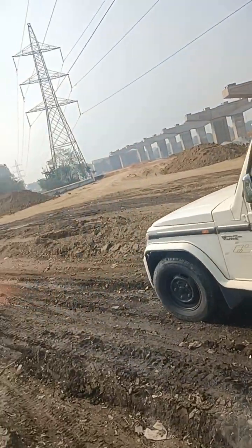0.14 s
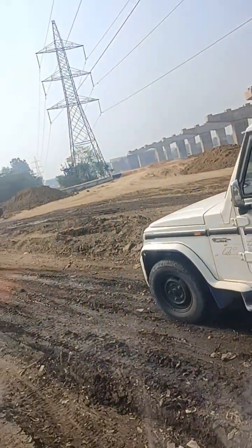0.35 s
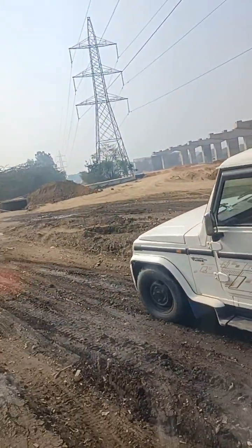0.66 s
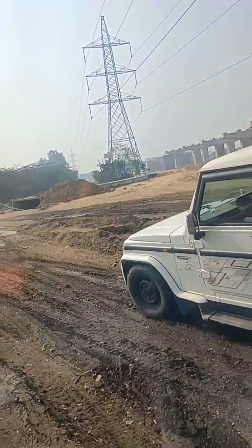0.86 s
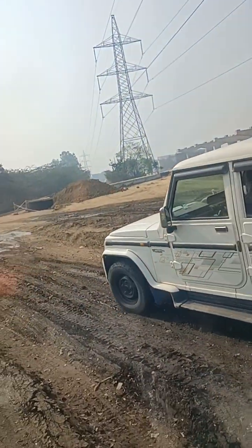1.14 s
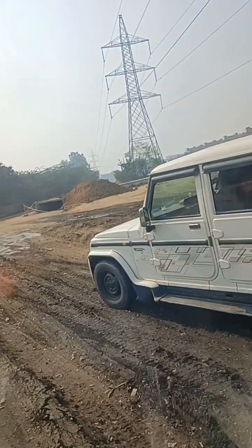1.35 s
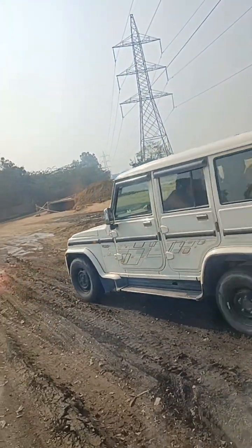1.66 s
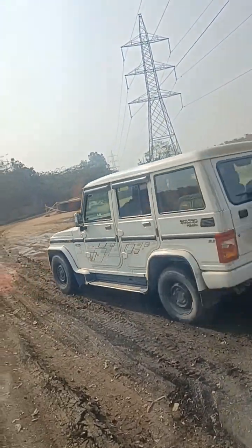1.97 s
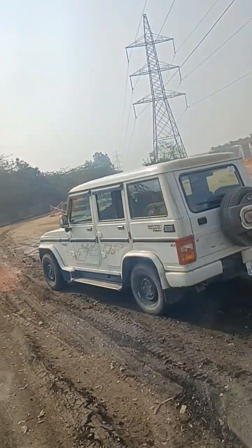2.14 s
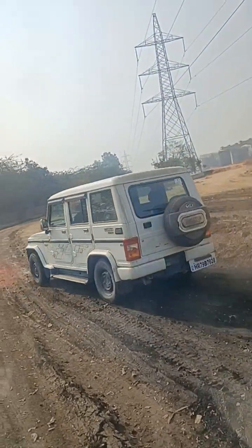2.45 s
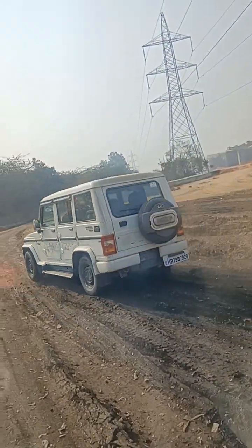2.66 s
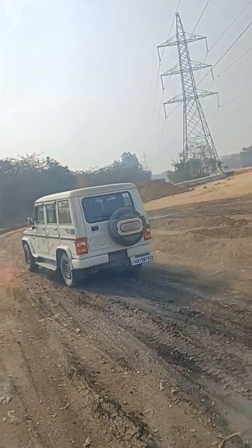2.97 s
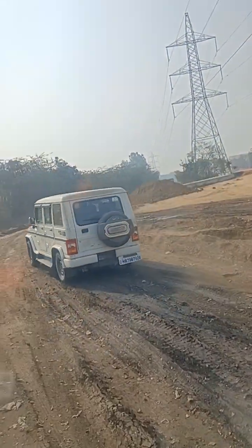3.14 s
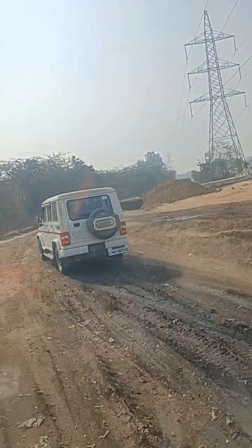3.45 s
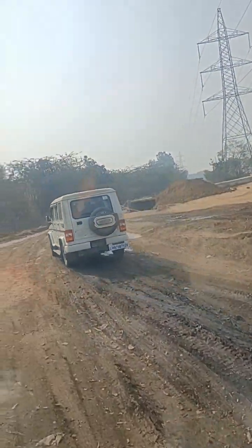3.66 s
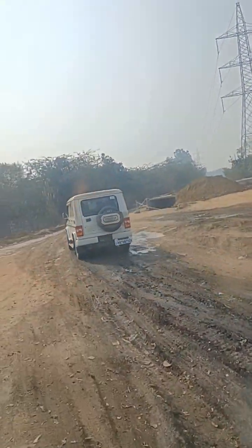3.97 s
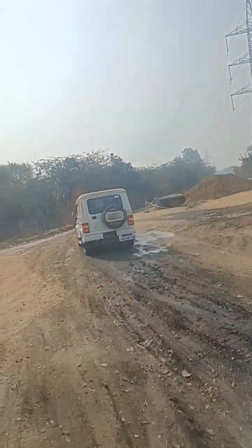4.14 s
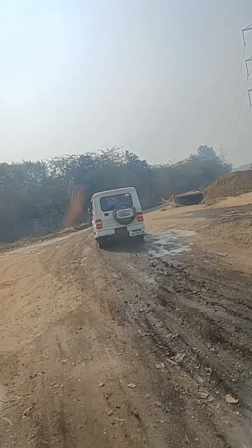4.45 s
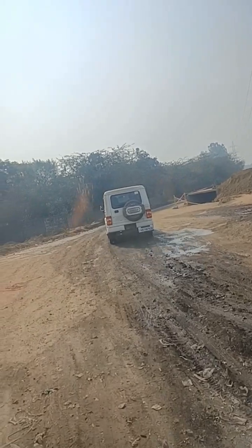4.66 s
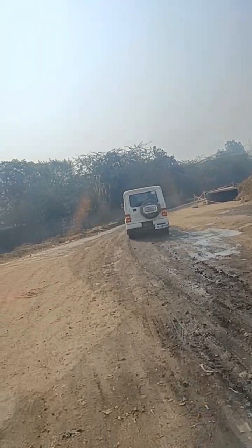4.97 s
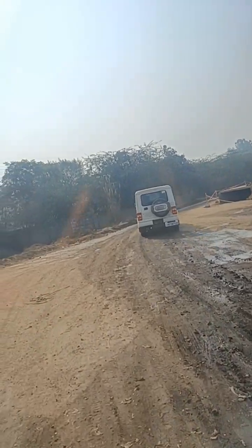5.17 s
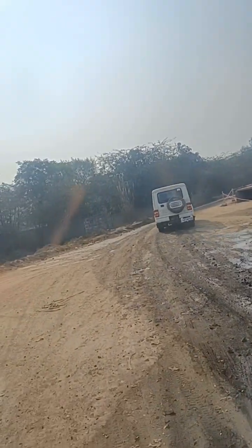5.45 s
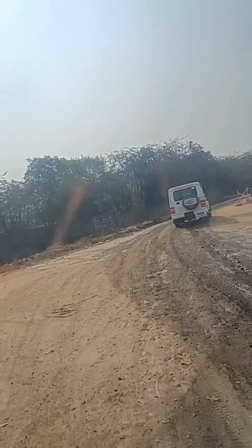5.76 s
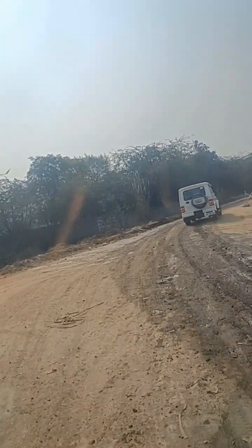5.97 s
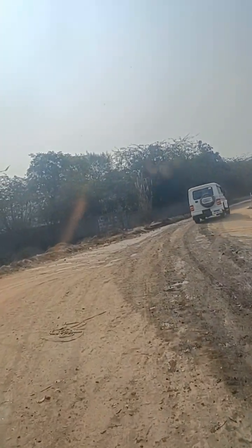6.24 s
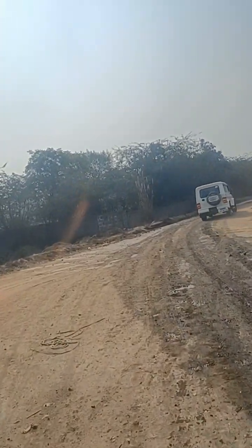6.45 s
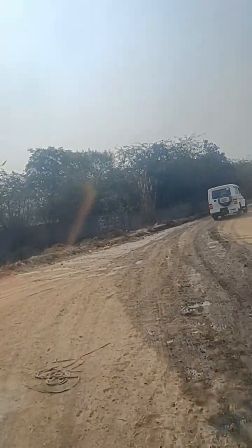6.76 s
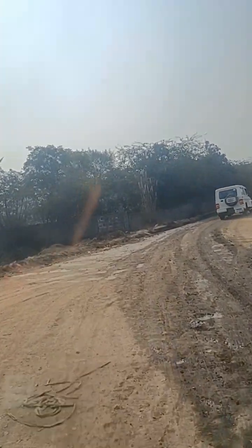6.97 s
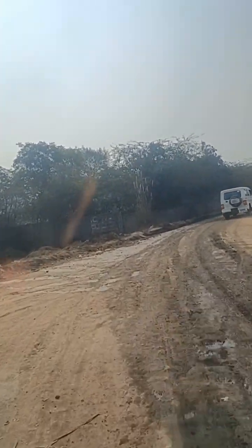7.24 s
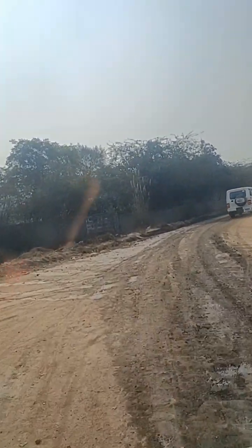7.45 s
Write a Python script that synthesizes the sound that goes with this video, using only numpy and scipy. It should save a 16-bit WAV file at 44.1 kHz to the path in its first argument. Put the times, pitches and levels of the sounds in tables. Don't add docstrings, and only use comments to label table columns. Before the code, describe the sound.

Heard from a phone inside a car on a rutted dirt track: a low, near-idling engine throb over wheel thud and tyre roar. A first second of knocks and plastic clatter gives way to a smoother stretch as the engine surges around two seconds, then eases. Sharp rattles hit at three and a half seconds, and bumps, rattles and squeaks crowd the last second as the engine climbs again.

```python
import sys
import numpy as np
from scipy import signal
from scipy.fft import rfft, irfft, next_fast_len
from scipy.io import wavfile
from scipy.ndimage import uniform_filter1d

SR = 44100
rng = np.random.default_rng(int(sys.argv[2]) if len(sys.argv) > 2 else 0)


def log_audio(samples):
    frames = np.atleast_2d(samples).T
    limited = np.clip(frames, -1, 1)
    pcm = np.round(limited * 32767).astype(np.int16)
    wavfile.write(sys.argv[1], SR, pcm)


def voltage_ratio(level):
    return 10 ** (np.asarray(level, float) / 20)


N = 335601

# (time [s], speed [engine cycles per s])
ENGINE_SPEED = [(0.0, 11.5), (.85, 11.6), (1.25, 12.9), (1.877, 13.9), (2.042, 18.21), (2.254, 21.85),
                (2.658, 18.92), (2.957, 18.95), (4.125, 13.25), (4.735, 14.38), (5.526, 17.14),
                (5.906, 16.37), (6.162, 17.77), (6.44, 17.66), (6.679, 21.24), (6.933, 19.61),
                (7.155, 22.76), (7.61, 22.82)]
# (time [s], level [dB])
ENGINE_LOAD = [(0.0, -17), (0.56, -25.5), (1.5, -23), (1.85, -14.5), (2.1, -10), (2.28, -8), (2.62, -12.5),
               (3.15, -13.5), (3.55, -17), (4.2, -11), (4.9, -18.5), (5.55, -15), (5.95, -17),
               (6.48, -15.5), (6.7, -13), (6.9, -15), (7.18, -9.5), (7.61, -10.5)]
SIDE_ORDERS = [-30, -29, -43, -35.5, -42, -41, -45, -48, -47]
# (frequency [Hz], gain [dB])
CABIN_BOOM = [(28, 0), (34, -4), (42, -4), (56, 0), (68, -11), (92, -16.5), (150, -21.5), (210, -34)]
# (frequency [Hz], width [Hz], level over the firing [dB])
DASH_PANELS = [(340, 35, -25), (507, 30, -28), (611, 26, -40)]
SECOND_ORDER_DB = -23
IDLE_PER_S, SHIFT_S = 12.8, .03
SHAKE_SHARE = .3
MOUNT_PER_S, MOUNT_WIDTH_PER_S, MOUNT_DB = 14.2, 2.0, 7

# (time [s], peak level [dB], ring [Hz], clank over the peak [dB])
LATCH_RATTLES = [(0.925, -32.5, 5370, -12), (1.002, -27, 5660, -27), (1.181, -32, 6300, 5),
                 (1.36, -34, 6070, -23), (1.3915, -28, 5930, -34), (2.8994, -34, 5680, 2),
                 (3.5442, -16, 5640, -19), (3.922, -27.5, 5300, -7), (4.4703, -37, 4070, 12),
                 (5.664, -22.5, 5100, -5.5), (5.9732, -23, 4500, -8), (6.508, -32, 3544, 3),
                 (6.622, -27.5, 5450, 7), (6.647, -9, 5460, -32), (6.764, -24, 4060, -13),
                 (7.033, -19.5, 5800, -39), (7.0746, -24, 5430, -16), (7.1178, -21, 5400, -26),
                 (7.261, -24, 4380, 2.5)]
# (time [s], peak level [dB], low ring [Hz], high ring [Hz], low ring over the peak [dB])
TRIM_TAPS = [(0.1954, -46, 3020, 6160, 9), (0.7067, -33.5, 2750, 4030, 5), (0.7236, -28, 2800, 5600, 4),
             (0.7444, -31.5, 2180, 5360, 7.5), (0.76, -32, 2170, 4080, -6), (0.8065, -33.5, 3520, 3860, 7),
             (0.8335, -40, 2550, 5630, 15), (0.8486, -28, 2720, 3900, 11.5), (1.53, -37, 2030, 5100, 3),
             (7.288, -35.5, 3550, 5400, 10), (0.8612, -29.5, 2510, 3300, 13), (0.8844, -57, 3100, 3600, 30),
             (1.0382, -21.5, 2300, 3950, -6), (1.1326, -19, 3260, 3630, -15), (1.1994, -40, 2380, 3700, 19),
             (1.6496, -31.5, 3500, 3827, 1), (3.494, -11, 3350, 5790, -24), (3.717, -26, 3310, 5220, -5),
             (4.0658, -34, 2618, 5230, 0), (6.4612, -29, 2640, 5770, -5), (6.5635, -33.5, 3500, 5770, 6),
             (6.7004, -29.5, 3040, 5253, 9), (6.825, -18, 2830, 3780, -38), (6.8585, -31.5, 1800, 3430, 5),
             (7.1741, -36, 2340, 5660, 11), (7.554, -22, 2600, 5800, -7)]
# (time [s], peak level [dB], low ring [Hz], high ring [Hz], low ring over the peak [dB])
CLOSE_SNAPS = [
    (0.0399, -33.5, 1430, 5470, 12.5),
    (0.17, -32, 3060, 6000, 15),
    (1.0531, -26.5, 1000, 3820, 0),
    (1.095, -23, 1660, 4850, -14.5),
    (3.5077, -39, 1400, 5810, -6.5),
]
# (frequency [Hz], level [dB])
TRIM_MODES = [(1427, 3), (1814, -19), (2300, -17), (2907, 21.5), (3348, 23), (3865, 19.5), (4673, 16),
              (5464, -14), (5846, -24), (6207, -14), (6589, -4)]
LATCH_CLANK_HZ = 1146
LATCH_FIZZ_DB, TAP_FIZZ_DB, SNAP_FIZZ_DB = -31, -36, -13.5
FIZZ_SQUEEZE = 0.033

# (time [s], peak level [dB], ring [Hz], brightness [dB], length [s])
SUSPENSION_KNOCKS = [(0.044, -25, 362, -10.5, 0.067), (0.099, -22.5, 325, -5, 0.026),
                     (0.11, -19.5, 225, -27, 0.011), (0.128, -17, 159, -41, 0.03),
                     (0.165, -24.5, 148, -7, 0.068), (0.441, -25.5, 318, -19, 0.043),
                     (0.731, -26, 238, -14, 0.068), (0.848, -27.5, 433, -8, 0.04),
                     (0.922, -27.5, 161, -20, 0.022), (1.049, -39, 151, -2, 0.052),
                     (1.178, -24.5, 205, -11, 0.02), (1.188, -23, 253, -18, 0.03),
                     (1.207, -25, 201, -23, 0.015), (1.669, -33.5, 151, -2, 0.025),
                     (2.891, -28, 167.2, -5.5, 0.043), (3.493, -21.5, 151, -15, 0.04),
                     (3.544, -34, 152, 2, 0.031), (3.913, -27.5, 152, -4, 0.039),
                     (4.458, -30, 150.6, -11, 0.033), (5.627, -23.5, 275.7, -21, 0.07),
                     (6.604, -25.5, 191, -14, 0.027), (6.836, -27, 274, -21, 0.024),
                     (7.024, -34, 157, -3, 0.042), (7.241, -36, 161, -1, 0.033),
                     (6.722, -30.5, 210, -28, 0.03), (7.1, -31.5, 205, -25, 0.03),
                     (7.344, -32, 198, -25, 0.04), (6.529, -28.5, 477, -24, 0.03),
                     (7.555, -23, 223, -32, 0.022)]
# (start time [s], length [s], first pitch [Hz], last pitch
# [Hz], level [dB])
RUBBER_SQUEAKS = [(7.362, .027, 5430, 5370, -33), (7.396, .056, 5580, 5270, -29),
                  (7.434, .056, 5210, 4890, -31), (2.22, .034, 1150, 1160, -41),
                  (2.256, .036, 1160, 1185, -36), (7.07, .04, 5400, 5750, -36),
                  (7.25, .24, 1235, 1215, -45), (6.63, .08, 1432, 1432, -43),
                  (1.085, .047, 4500, 4800, -37), (7.05, .08, 1440, 1425, -42),
                  (7.255, .05, 1430, 1415, -40), (7.17, .33, 159, 162, -36), (7.08, .45, 595, 615, -45),
                  (6.05, .3, 960, 975, -48), (6.78, .12, 310, 265, -35)]
GRIP_S, GRIP_DB, SLIP_DB = .015, -10, -7

# (time [s], level [dB])
TRACK_SHAKE = [(0.0, 1.5), (0.25, -1), (1.4, -0.5), (2.3, 2), (2.7, 0), (4.0, 1), (5.0, 0), (6.3, 3),
               (7.3, 4.5), (7.61, 5)]
# (frequency [Hz], density [dB per Hz])
THUD_COLOUR = [(8, -44), (18, -41), (27, 6), (38, -35), (55, 12.5), (80, -1), (120, -42), (160, -36)]
# (frequency [Hz], density [dB per Hz])
ROAR_COLOUR = [(53, -45), (90, -7.5), (103, -8), (172, -13.5), (287, -16), (385, -22.5), (600, -24),
               (956, -29), (1200, -31.5), (1560, -86), (2640, -120)]
# (frequency [Hz], density [dB per Hz])
HUM_COLOUR = [(410, -23), (700, -29), (791, 0.5), (960, -5), (1920, -4), (2080, -3.5), (3470, -8.5),
              (4040, -8), (4760, -11.5), (5830, -10.5), (7010, -15), (8000, -13), (10400, -26),
              (17600, -120)]
# (frequency [Hz], density [dB per Hz])
HISS_COLOUR = [(4880, -56), (8300, -26), (9290, -18), (10300, -6.5), (12300, -10), (13400, -7),
               (14100, -4.5), (14900, -10), (15500, -12)]
# (frequency [Hz], width [Hz], level over the hum [dB])
BODY_PANELS = [(23.5, 4.1, 1), (35.65, 5.8, 15.5), (205.1, 11.4, -1), (290.5, 77, -5), (430, 29, -10),
               (605.5, 39, -11), (1202, 11, -21.5), (2490, 560, -13), (1415, 3.4, -23)]
# (frequency [Hz], width [Hz], level [dB], place in the cycle [0-1])
VALVE_TICKS = [(5660, 400, -41, 0.6), (10470, 400, -47, 0.45), (6770, 520, -43, 0.63),
               (14300, 2500, -60, 0.46), (14000, 2500, -56, 0.23)]
CRUISE_PER_S = 17
THUD_DB, THUD_LOAD, THUD_LUMP_DB = -27.5, 0.14, 1.5
ROAR_DB, ROAR_SHAKE = -34, 0.33
HUM_DB, HUM_DB_PER_CYCLE = -42.5, 0.3064
HISS_DB, HISS_DB_PER_CYCLE, HISS_LOAD = -50.5, 0.2, 0.57

# (frequency [Hz], likeness [0-1])
PORT_LIKENESS = [(60, 0.98), (130, 0.93), (290, 0.94), (640, 0.59), (1400, 0.16), (3100, 0.11),
                 (6800, 0.073), (15000, 0.18)]
# (frequency [Hz], level [dB])
PORT_TILT = [(60, 1), (200, .5), (380, -1), (700, -3), (1290, -1.5), (2380, 0), (4400, 5), (6400, 8),
             (8300, 1), (9600, 6), (11500, 13), (13500, 22), (15500, 28)]
# (frequency [Hz], phase [radians])
PORT_LEAD = [(60, .08), (250, .3), (520, .6), (1120, 3.1), (4050, 12.3), (6550, 20.9), (16000, 50)]
# (frequency [Hz], gain [dB])
MIC_COLOUR = [(6600, -0.5), (7400, -8), (8300, -13.5), (9200, -2.5), (10000, -3), (15400, 3.5),
              (15850, -28), (16000, -47)]
# (frequency [Hz], level over the running level [dB])
DROP_LIMIT = [(6900, -30), (7500, 0), (9100, .5), (9800, -30)]


def engine():
    (speed,), (load_db,) = columns(ENGINE_SPEED), columns(ENGINE_LOAD)
    turns = np.cumsum(speed) / SR
    mount_db = MOUNT_DB * np.exp(-((speed - MOUNT_PER_S) / MOUNT_WIDTH_PER_S) ** 2)
    idle = np.clip(1 + IDLE_PER_S - speed, 0, 1)

    levels = [(2, SECOND_ORDER_DB - 3 * idle + 2.2 * wander(5))]
    for order, db in enumerate(SIDE_ORDERS, start=4):
        idle_db = 7 if order == 4 else -2
        levels.append((order, db + mount_db + idle_db * idle + 1.8 * wander(6)))
    boom = np.zeros(N)
    for order, db in levels:
        phase = order * turns + SHIFT_S * (order - 3) * (speed - 14.5)
        phase += 0.46 * (order < 3) + (order > 7) * rng.random()
        boom += voltage_ratio(SHAKE_SHARE * (load_db + 7.5) + db) * np.cos(2 * np.pi * phase)

    firing_db = load_db + read(CABIN_BOOM, 3 * speed)
    pushes = sum(np.cos(2 * np.pi * 3 * k * turns) for k in range(4, 17))
    for hz, width, db in DASH_PANELS:
        boom += voltage_ratio(firing_db + db) * resonate(resonate(pushes, hz, width), hz, width)
    boom += voltage_ratio(firing_db) * np.cos(2 * np.pi * 3 * turns)
    return np.sqrt(2) * boom, turns


def rattle(db, low_hz, high_hz, low_db, fizz_db):
    shape = burst(.014, 0.12, 0.0015)
    drive = rng.standard_normal((2, len(shape))) * voltage_ratio(1.5 * rng.exponential(1, len(shape)))
    rings = voltage_ratio(low_db - 3) * steep(drive, low_hz, 220) + voltage_ratio(-4) * steep(drive, high_hz, 450)
    panel = sum(voltage_ratio(level + 4 * rng.standard_normal()) * steep(drive, hz, 260) for hz, level in TRIM_MODES)
    crack = voltage_ratio(.4 * low_db) * steep(drive, 2600, 3500) + voltage_ratio(-4) * steep(drive, 5000, 3000)
    fizz = voltage_ratio(2) * steep(drive, 10300, 3000) + steep(drive, 13400, 3500)
    sound = rings + voltage_ratio(-9.5) * evened(panel) + crack + voltage_ratio(fizz_db + 11.0) * fizz
    return voltage_ratio(db - 7.0) * shape * sound


def knock(db, hz, bright_db, length):
    shape = burst(length, .085, .003 + .1 * length)
    drive = rng.standard_normal((2, len(shape)))
    body = steep(drive, hz, 128) + voltage_ratio(4.0) * steep(drive, 280, 500)
    slap = voltage_ratio(bright_db + 9.0) * steep(drive, 840, 850)
    return voltage_ratio(db - 4.5) * shape * (body + slap)


def squeak(length, first_hz, last_hz, db):
    t = np.arange(0, length, 1 / SR)
    slips = 1 + .008 * np.round(wander(40)[:len(t)])
    hz = (first_hz + (last_hz - first_hz) * t / length) * slips
    fuzz = steep(rng.standard_normal((2, len(t))), hz, 0.015 * hz.mean())
    tone = np.sqrt(2) * np.sin(2 * np.pi * np.cumsum(hz) / SR) + .6 * fuzz
    swell_s = np.clip(GRIP_S, .005, length / 4)
    stroke_db = np.interp(t, [0, swell_s, length], [GRIP_DB, 0, SLIP_DB])
    stroke = voltage_ratio(db + stroke_db + 1.5 * wander(70)[:len(t)])
    return stroke * tone * signal.windows.tukey(len(t), .15)


def valve_ticks(turns, load_db, hiss_db):
    out = np.zeros((2, N))
    for hz, width, db, place in VALVE_TICKS:
        since = ((turns - place) % 1) / np.gradient(turns) / SR
        low = hz < 7000
        db += low * 1.4 * np.minimum(load_db + 12.5, 0)
        level_db = db + 3 * wander(9) + (.9 if low else .3) * (hiss_db + 52)
        strike = voltage_ratio(level_db - 60 * since / .06) * np.minimum(since / .003, 1)
        out += strike * steep_pair(hz, width)
    return out


def road(turns):
    (speed,), (load_db,), (shake_db,) = columns(ENGINE_SPEED), columns(ENGINE_LOAD), columns(TRACK_SHAKE)
    working = np.clip(speed - IDLE_PER_S, 0, 1)
    faster = speed - CRUISE_PER_S
    thud_db = THUD_DB + THUD_LOAD * (load_db + 17.0) + THUD_LUMP_DB * wander(2.4)
    roar_db = ROAR_DB + ROAR_SHAKE * shake_db
    hum_db = HUM_DB + shake_db + HUM_DB_PER_CYCLE * faster
    hiss_db = HISS_DB + HISS_DB_PER_CYCLE * faster + HISS_LOAD * (load_db + 14.5)
    breath_db = np.cos(2 * np.pi * (turns - .55)) + .5 * np.cos(2 * np.pi * (4 * turns - .1))
    breath_db *= working

    out = voltage_ratio(thud_db) * noise(THUD_COLOUR, size=8192, patchy_db=1, flicker_db=1.5)
    out += voltage_ratio(roar_db + 1.5) * noise(ROAR_COLOUR, size=2048, patchy_db=1.5, flicker_db=.7)
    out += voltage_ratio(hum_db + 2.0 + 0.23 * breath_db) * noise(HUM_COLOUR, size=512, patchy_db=2.0, flicker_db=.5)
    out += voltage_ratio(hiss_db + 2.8 * breath_db) * noise(HISS_COLOUR, size=512, patchy_db=2.2, flicker_db=1)
    for hz, width, db in BODY_PANELS:
        out += voltage_ratio(hum_db + db + 4 * wander(4)) * steep(rng.standard_normal(N), hz, 1.5 * width)
    return out + working * valve_ticks(turns, load_db, hiss_db)


def noise(colour, size, patchy_db, flicker_db):
    frames, hz = 4 * N // size + 5, np.fft.rfftfreq(size, 1 / SR)
    a, b, c, d, patches = rng.standard_normal((frames, len(hz), 5)).T
    patches = uniform_filter1d(uniform_filter1d(patches, size=8, axis=0), size=8, axis=1)
    flicker = evened(uniform_filter1d(rng.standard_normal(frames), size=4))
    outside = (hz < colour[0][0]) | (hz > colour[-1][0])
    shape_db = np.where(outside, -120, read(colour, hz))
    level = voltage_ratio(shape_db[:, None] + patchy_db * evened(patches) + flicker_db * flicker)
    z = np.array([a + 1j * b, c + 1j * d]) * level
    return evened(signal.istft(z, nperseg=size, noverlap=size - size // 4)[1][:, :N])


def burst(length, fall_s, rise_s):
    t = np.arange(round((length + fall_s) * SR)) / SR
    return np.minimum(t / rise_s, 1) * voltage_ratio(-250 * t - 60 * np.maximum(t - length, 0) / fall_s)


def resonate(x, hz, width):
    turn = np.exp(2j * np.pi * np.cumsum(hz * np.ones(x.shape[-1])) / SR)
    r = np.exp(-np.pi * width / SR)
    return 2 * (turn * signal.lfilter([1 - r], [1, -r], x / turn + 1e-18)).real


def steep(x, hz, width):
    return evened(resonate(resonate(x, hz, width), hz, width))


def steep_pair(hz, width):
    return steep(rng.standard_normal((2, N)), hz, width)


def wander(per_s):
    knots = rng.standard_normal(400)
    return np.interp(np.arange(N) / SR * per_s, np.arange(400), knots) * 1.22


def evened(x):
    return x / np.sqrt(np.mean(x ** 2) + 1e-20)


def read(points, hz):
    f, value = np.transpose(points)
    return np.interp(np.log(hz + 1), np.log(f + 1), value)


def columns(rows):
    s, *values = np.transpose(rows)
    return [np.interp(np.arange(N) / SR, s, v) for v in values]


def add(mix, s, sound):
    part = mix[:, round(s * SR):][:, :sound.shape[1]]
    part += sound[:, :part.shape[1]]


def scene():
    boom, turns = engine()
    mix = road(turns)
    mix[0] += boom
    latch = [(s, db, LATCH_CLANK_HZ, hz, clank_db) for s, db, hz, clank_db in LATCH_RATTLES]
    for rows, fizz_db in [(latch, LATCH_FIZZ_DB), (TRIM_TAPS, TAP_FIZZ_DB), (CLOSE_SNAPS, SNAP_FIZZ_DB)]:
        for s, db, *rings in rows:
            add(mix, s, rattle(db, *rings, fizz_db - FIZZ_SQUEEZE * (db + 40)))
    for s, *row in SUSPENSION_KNOCKS:
        add(mix, s, knock(*row))
    for s, *row in RUBBER_SQUEAKS:
        add(mix, s, squeak(*row))
    return mix


def bin_gate(x):
    hz, _, z = signal.stft(x, SR, nperseg=1024)
    power = uniform_filter1d(uniform_filter1d(abs(z) ** 2, size=3, axis=1), size=3, axis=2)
    running = np.exp(uniform_filter1d(np.log(power + 1e-20), size=13, axis=2))
    limit = voltage_ratio(2 * read(DROP_LIMIT, hz))[:, None] * running
    gain = np.where(power < limit, voltage_ratio(-22), 1)
    return signal.istft(z * gain, nperseg=1024)[1][:, :N]


def top_cut(x):
    return signal.sosfilt(signal.butter(12, 16320, fs=SR, output="sos"), x)


def record(dry):
    size = next_fast_len(N + 4096)
    hz, (shared, other) = np.fft.rfftfreq(size, 1 / SR), rfft(dry, size)
    same, tilt_db = np.clip(read(PORT_LIKENESS, hz), 0, 1), read(PORT_TILT, hz)
    left = shared * np.sqrt(2 / (1 + voltage_ratio(-2 * tilt_db)))
    late = shared * np.exp(-1j * np.interp(hz, *np.transpose(PORT_LEAD)))
    right = (same * late + np.sqrt(1 - same ** 2) * other) * np.sqrt(2 / (1 + voltage_ratio(2 * tilt_db)))
    ports = irfft(np.array([left, right]) * voltage_ratio(read(MIC_COLOUR, hz)), size)[:, :N]
    return top_cut(bin_gate(ports))


dry = scene()
out = record(dry)
log_audio(out)
```